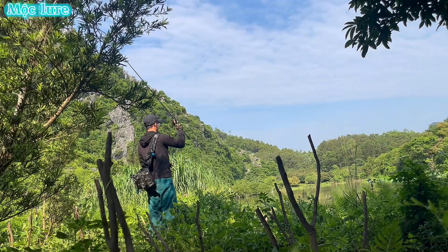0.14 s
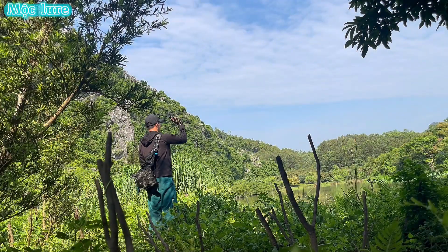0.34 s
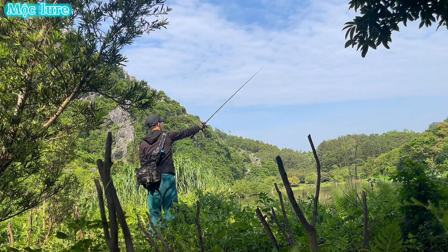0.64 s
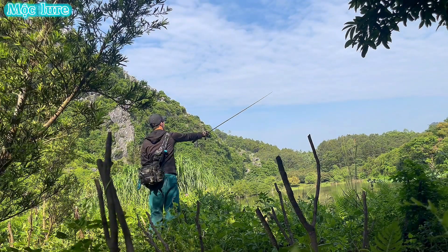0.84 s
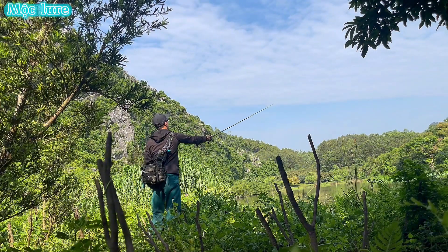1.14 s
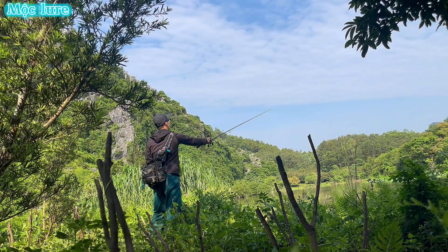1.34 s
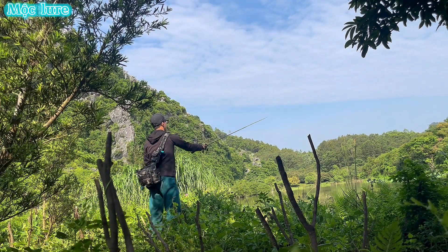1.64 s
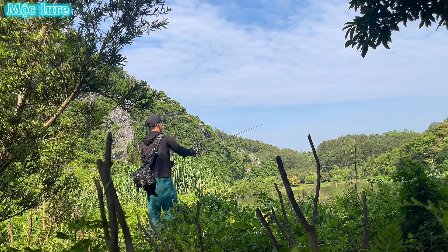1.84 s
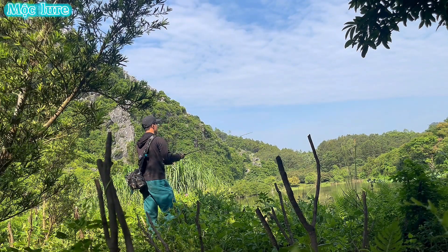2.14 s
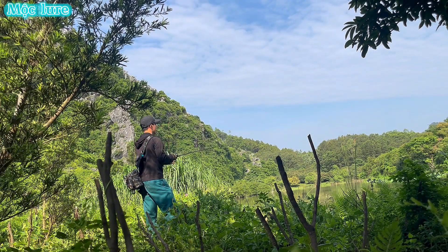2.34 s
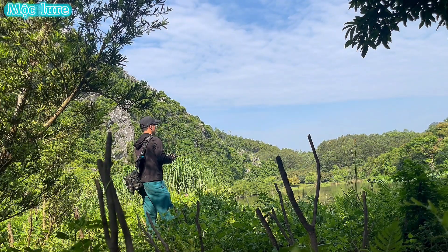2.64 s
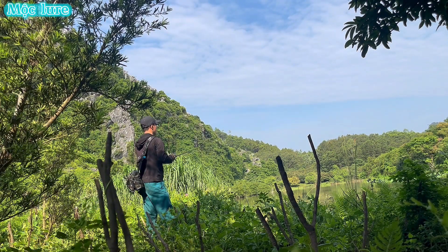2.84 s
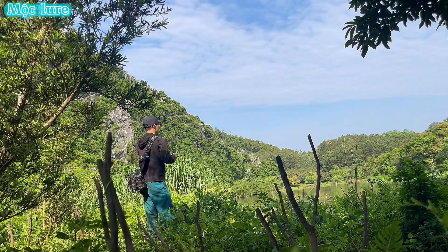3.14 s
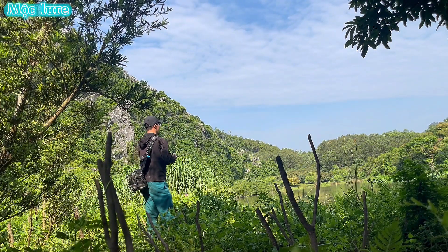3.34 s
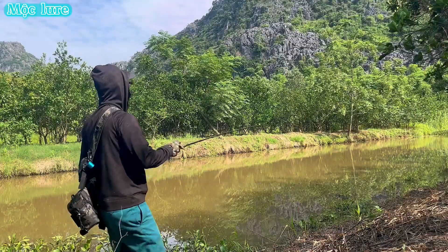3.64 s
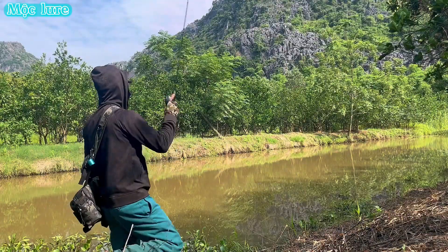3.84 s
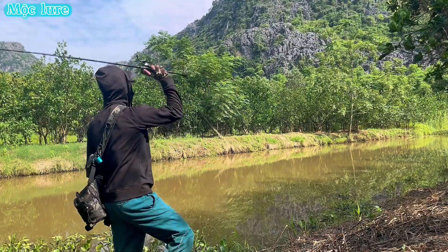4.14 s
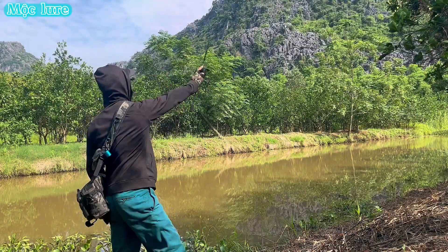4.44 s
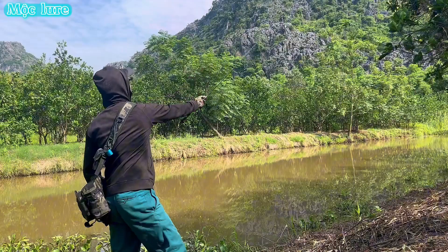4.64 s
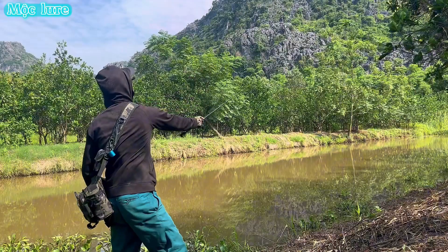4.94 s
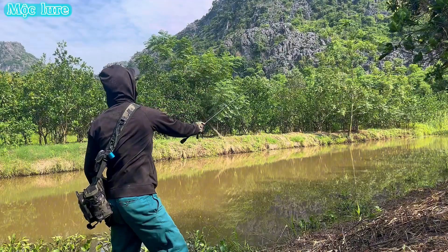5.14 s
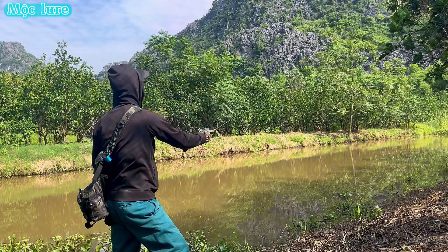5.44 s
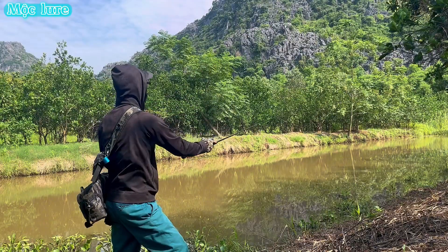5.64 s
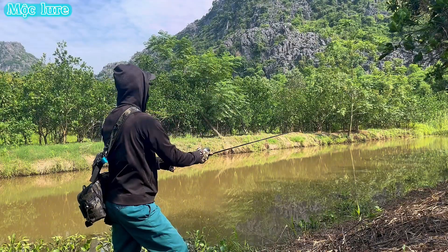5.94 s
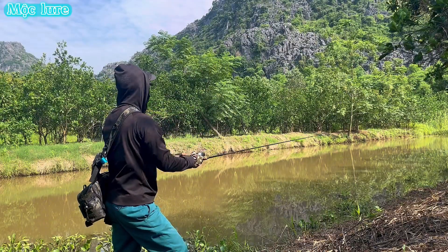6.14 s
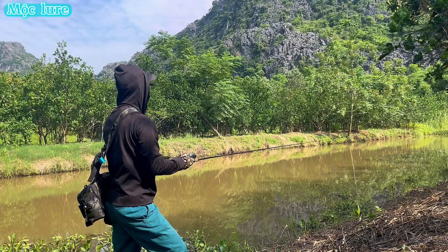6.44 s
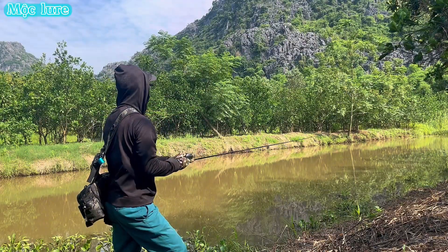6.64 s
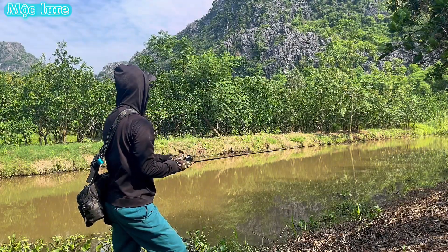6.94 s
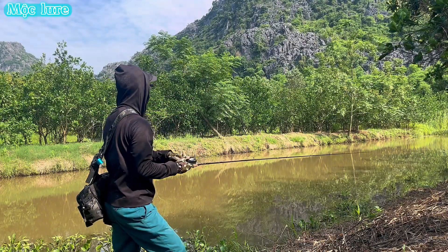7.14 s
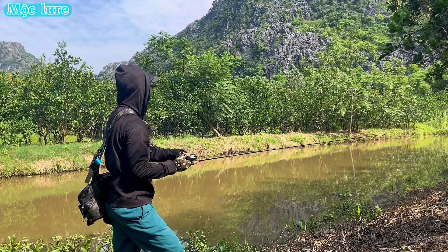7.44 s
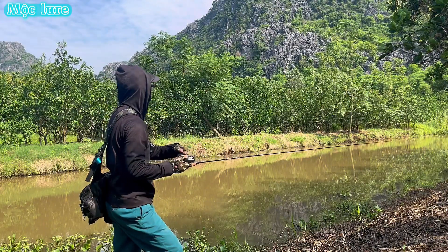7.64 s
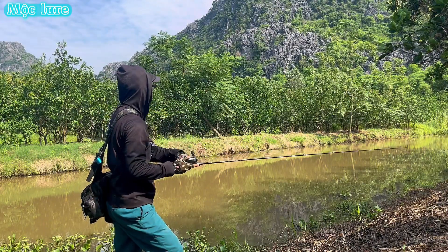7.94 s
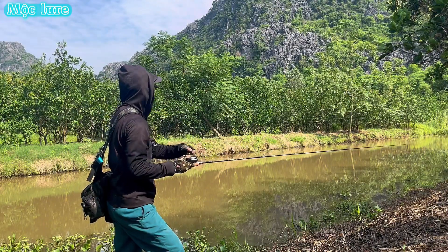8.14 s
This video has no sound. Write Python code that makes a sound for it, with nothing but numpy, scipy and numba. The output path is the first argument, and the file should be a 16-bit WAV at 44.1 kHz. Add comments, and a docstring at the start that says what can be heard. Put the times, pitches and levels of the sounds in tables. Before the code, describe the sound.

From 0 to 3.44 seconds, a wide meadow carries low breeze rumble, rustle and a dense pulsing cricket chorus around five kilohertz, weighted right, plus a nearer high trill with short gaps. Tackle clicks at 0.33 and 0.43; a bright whipping swish with line hiss peaks around 0.55, scattering off foliage. Clicks follow at 0.73, 0.92 and 1.37 over a faint spool whine and line whistle fading by 1.6. Small clicks come at 1.86 and 2.6. Bird whistles swoop down and up from 2.3 to 3.2, with dull rustles. Sharp clicks at 3.18 and 3.48 straddle the abrupt cut. The rumble vanishes, leaving quieter, steady, hissy cicadas. A soft rush precedes a short backswing whoosh and thump at 4.2, then a sharper forward whip and line snap at 4.43-4.48. Small reel clicks sound around 6.9; cicadas continue to the end, about 8.4.

```python
"""Crickets over a low meadow rumble come first: a throbbing chorus, one near trill, then a swooping bird.
An angler casts there: the rod sheds swept vortex tones, the tackle clicks, the spool whines, line whistles.
After a cut with a click, a quieter pond with far cicadas (noise clicks through resonances) has a second cast:
the rod swishes back and forth and the reel clicks shut. Leaves and hillside scatter decaying noise echoes."""
import sys
import numpy as np
from scipy import signal
from scipy.fft import rfft, irfft, next_fast_len
from scipy.io import wavfile
from numba import njit

SR = 44100
rng = np.random.default_rng(int(sys.argv[2]) if len(sys.argv) > 2 else 0)


def transcribe(signal):
    """Save signal, clipped to [-1, 1], as a 16-bit WAV file at the path in sys.argv[1]."""
    frames = np.atleast_2d(signal).T
    limited = np.clip(frames, -1, 1)
    pcm = np.round(limited * 32767).astype(np.int16)
    wavfile.write(sys.argv[1], SR, pcm)


N = 365588
t = np.arange(N) / SR

MEADOW_END_S, POND_START_S = 3.441, 3.463
TOP_HZ = 15800
GUST_S, GUST_WIDTH_S, GUST_DB = 2.32, 0.7, 3.5  # one swell of the breeze
RUMBLE_DB = -43
BUZZ_HZ = 101.5  # stroke rate of the nearest chorus singers
STROKE_PERIOD_S = .0329  # near cricket
BIRD_TOP_HZ, BIRD_FADE_S = 2626, 0.016
THROAT_HZ, THROAT_WIDTH_HZ = 2390, 510
REEL_RING_HZ, REEL_RING_DB = 1965, -50
PAYOUT_START_S, PAYOUT_END_S = 0.49, 1.61
SLOW_TONE_SHARE = 0.54  # share of the top tone left as the rod comes to rest
LOUDNESS_POWER = 1.37  # amplitude follows speed to this power

# Noise colours, relative levels: (frequency [Hz], density [dB per Hz])
# meadow rumble, common to both sides
RUMBLE_COLOUR = [(15, -50), (25, -24), (53, 1), (80, 2.5), (99, -0.5), (225, -17.5), (482, -29.5),
                 (908, -33.5), (1050, -30.5), (1330, -30), (1510, -33.5), (1980, -18.5), (2960, -17),
                 (3660, -29.5), (3900, -25.5), (5070, -25), (8580, -120)]
# meadow rustle, opposite on the two sides
RUSTLE_COLOUR = [(25, -25), (70, -1), (130, -3), (250, -11.5), (500, -13.5), (900, -12.5), (1350, -4),
                 (1700, -9), (2200, -7), (3100, -8), (3700, -32), (6000, -25)]
# small insects' hiss
INSECT_HISS_COLOUR = [(2500, -23), (4000, 2.5), (6500, 4), (8300, 1.5), (10600, 5.5), (11200, -6.5),
                      (12200, -66), (14800, -1.5), (16000, -36)]
# pond background
POND_AIR_COLOUR = [(22, -26), (55, 1.5), (100, 0), (200, -12.5), (400, -20), (800, -28), (1200, -30),
                   (2200, -9.5), (5500, -12), (7200, -18.5), (10000, -17.5), (11500, -28), (12600, -36.5),
                   (15000, -38)]
# line running through the rings
LINE_HISS_COLOUR = [(1500, -6), (3500, 2.5), (4800, 0), (6200, -7.5), (9000, 0), (11000, -4), (12500, -24),
                    (14500, 0), (16000, -17)]
# line slaps and bright click snaps
SNAP_COLOUR = [(3000, -18), (6500, -15), (8600, 1), (11000, 1), (12500, -15), (14500, -3), (16000, -14),
               (18000, -40)]

# Cricket chorus groups: (pitch [Hz], pitch spread [Hz], level [dB], left minus right [dB], chirp rate [1/s],
# first chirp [s], throb depth [0-1], buzz depth [0-1], slow level wander [dB])
CHORUS_GROUPS = [(4732, 185, -41, -8.5, 3.17, 0.046, 0.02, 0, 1.5),
                 (5130, 200, -41, -6.5, 7.665, 0.13, 0.1, 0.24, 1),
                 (5462, 190, -40, -11, 7.665, 0.12, 0.32, 0.17, .5)]
# Near cricket's trills: (first stroke [s], end [s], level [dB])
CRICKET_TRILLS = [(.025, .96, -42), (1.342, 1.62, -46.5), (1.668, 3.43, -43.5)]
# Bird's swoops, level before the throat resonance: (lowest point [s], fall [s], rise [s], lowest pitch [Hz],
# level going down [dB], level going up [dB])
BIRD_SWOOPS = [(2.3, .05, 0.053, 2500, -49, -47.5), (2.545, .049, 0.084, 1830, -60, -37),
               (2.806, .085, .11, 1557, -44.5, -32.5), (3.113, .085, .11, 1637, -39.5, -37.5)]
# Bird's thin upper notes: (start [s], end [s], first pitch [Hz], last pitch [Hz], level [dB])
BIRD_UPPER_NOTES = [(2.22, 2.31, 3270, 3010, -58), (2.56, 2.64, 3080, 3030, -45)]
# Cicada resonances: (centre [Hz], width [Hz], level [dB], throb [dB])
CICADA_RESONANCES = [(1668, 355, -57.5, 1.48), (3248, 750, -51, 0.5), (4700, 170, -56, 1),
                     (4610, 1100, -58.5, 0.3)]
# Thin insect tones at the pond: (pitch [Hz], level [dB])
POND_INSECT_TONES = [(5136, -69), (9943, -76), (10740, -80)]
# Clicks of the tackle, and one at the cut between scenes: (time [s], peak of the ring [dB], main ring [Hz],
# rattle t60 [s], bright snap relative to the click [dB])
CLICK_EVENTS = [(.328, -21.5, 2190, 0.083, -14), (.43, -26.5, 2270, .06, -35),
                (.733, -23.5, 2090, 0.14, -30), (.917, -25.5, 2060, 0.076, -35),
                (1.365, -34.5, 2000, .05, -30), (1.862, -30.5, 2880, .03, -28),
                (2.619, -28.5, 3070, .03, -4), (2.65, -23, 2040, 0.091, -28),
                (3.148, -25.5, 2800, 0.045, -24), (3.1758, -18, 2800, .053, -11.5),
                (3.4817, -26, 2280, 0.034, -25), (3.4825, -20.5, 3430, 0.052, -16),
                (4.4825, -23.5, 1753, .035, -14), (6.8807, -31, 1850, 0.055, -13),
                (6.9403, -27.5, 1820, 0.11, -11), (6.9414, -35, 3200, .04, -26),
                (6.9645, -32.5, 1890, .045, -11)]
# Click resonances: (multiple of the main ring [1], width / centre [1], level [dB])
CLICK_MODES = [(.6, 0.17, -19), (1, 0.23, 5.5), (1.45, 0.24, -3), (2.2, 0.6, -9)]
# Dull knocks, rustles and low puffs of air:
# (time [s], peak [dB], centre [Hz], excitation t60 [s], width / centre [1])
DULL_EVENTS = [(2.437, -40, 696, 0.32, 2.3), (2.55, -45.5, 850, 0.53, 1.6), (2.72, -40.5, 547, 0.04, 0.11),
               (2.934, -39.5, 378, 0.045, 0.46), (3.05, -41.5, 750, 0.12, 2.8),
               (3.178, -31, 1730, 0.054, 0.13), (3.252, -36, 457, 0.25, 2.5), (3.399, -35, 482, 0.18, 2.4),
               (3.482, -33, 1050, 0.025, 1.4), (3.6, -48, 1000, 0.11, 1.4),
               (3.701, -44.5, 1000, 0.027, 1.8), (3.883, -42.5, 650, 0.051, 2.3),
               (4.192, -24.5, 553, .04, 0.89), (4.272, -36, 900, .03, 1.6), (4.314, -37.5, 800, 0.021, 1.8),
               (4.445, -37.5, 70, 0.24, 0.91), (6.3, -41, 45, 0.45, 0.78), (6.942, -46.5, 98, 0.091, 0.43),
               (6.965, -49, 880, 0.063, 0.71)]
# Spool whine during payout: (time [s], whine [Hz], level [dB])
SPOOL_WHINE = [(.7, 1487, -74), (.8, 1610, -67), (.94, 1715, -58.5), (.955, 1850, -50), (1.04, 1768, -52.5),
               (1.2, 1650, -59), (1.33, 1580, -63), (1.4, 1520, -74)]
# Whistles of the running line: (start [s], end [s], first pitch [Hz], last pitch [Hz], level [dB])
RUNNING_LINE_WHISTLES = [(.68, .95, 1300, 1303, -62), (1.32, 1.52, 1397, 1210, -58.5),
                         (1.5, 1.63, 1377, 1340, -61)]
# Line slaps on the rings: (time [s], length [s], level at onset [dB])
LINE_SLAPS = [(0.559, 0.0058, -25.5), (0.572, .009, -24), (0.931, 0.0079, -29), (4.461, .002, -37),
              (4.468, .003, -31), (4.4748, .0035, -29.5), (4.4795, 0.0033, -29.5)]
# Line zips off the finger: (start [s], end [s], first pitch [Hz], last pitch [Hz], level [dB])
FINGER_ZIPS = [(4.4362, 4.4412, 3900, 5200, -29)]
# Vortex shedders, rod butt, middle, tip and rings: (multiple of the tone [1], width / centre [1], level [dB])
ROD_VORTICES = [(.24, 1, -16), (.6, 0.86, -7), (1, 0.77, -1), (1.8, 0.68, -15)]
# Rod strokes: (fastest point [s], speed-up [s], slow-down [s], top vortex tone [Hz], rush [dB],
# clean tone [dB], line hiss [dB], low puff [dB])
ROD_STROKES = [(.521, .008, .012, 1020, -47, -38.5, -37, -59),
               (.537, .006, 0.0082, 1250, -34, -30, -45, -53), (.54, .01, 0.013, 399.3, -56, -39, -70, -57),
               (0.549, .011, .014, 2800, -30, -43, -37, -45),
               (.573, .02, 0.024, 2397, -32.5, -37, -30.5, -45),
               (.604, .007, 0.012, 747, -44, -44, -57, -68), (.64, .0189, .06, 1080, -63, -55, -60, -72),
               (.65, .06, 0.1, 2700, -45, -62, -46.5, -68), (3.7, .3, 0.23, 750, -66, -90, -61, -67.5),
               (4.196, .0053, 0.011, 620, -32.5, -43, -48, -52),
               (4.215, .008, 0.013, 624, -37.5, -41, -54, -50),
               (4.275, .11, .056, 800, -54, -67, -46.5, -65),
               (4.295, .0067, .007, 1200, -44, -50, -59, -60), (4.426, .018, .01, 640, -40, -49, -46, -61),
               (4.443, .004, .004, 560, -37, -38, -50, -49),
               (4.446, .007, .006, 1800, -29.5, -41, -44, -58),
               (4.458, .008, 0.009, 2100, -29, -38, -40, -58),
               (4.474, .005, .005, 2500, -35.5, -52, -42, -56),
               (4.482, .0035, 0.0062, 1500, -31, -38, -37.5, -40.5)]


def undb(db):
    """Decibels to amplitude gain."""
    return 10 ** (np.asarray(db) / 20)


def unit(x):
    """Scale to rms 1."""
    return x / np.sqrt(np.mean(x ** 2) + 1e-20)


def during(start_s, end_s, fade_s=0.00087):
    """Gate with linear ramps."""
    return np.clip((t - start_s) / fade_s, 0, 1) * np.clip((end_s - t) / fade_s, 0, 1)


def pan(db):
    """Left and right gains for a left-minus-right level."""
    return undb(np.array([[db], [-db]]) / 2)


def place(x, pan_db=0, lead_ms=0):
    """An off-centre source: louder on one side, later on the right."""
    delay = int(round(lead_ms * SR / 1000))
    return np.array([x, np.roll(x, delay)]) * pan(pan_db)


def add(out, start_s, x):
    """Mix a short sound in at a time."""
    i = int(max(start_s, 0) * SR)
    out[i:i + len(x)] += x[:max(N - i, 0)]


def walk(knots_per_s, size=N):
    """Interpolated random wander with a spread near 1."""
    knots = rng.standard_normal(2000)
    return 1.243 * np.interp(t[:size] * knots_per_s, np.arange(len(knots)), knots)


def noise(colour):
    """Gaussian noise shaped by a colour table, rms 1."""
    hz, db = np.transpose(colour)
    size = next_fast_len(N)
    f = np.maximum(np.fft.rfftfreq(size, 1 / SR), 1)
    gain = undb(np.interp(np.log(f), np.log(hz), db))
    return unit(irfft(rfft(rng.standard_normal(size)) * gain, size)[:N])


@njit
def svf(x, g, k):
    """State-variable band-pass with a moving centre."""
    y, band, low = np.empty(len(x)), 0., 0.
    for i in range(len(x)):
        v = (band + g[i] * (x[i] - low)) / (1 + g[i] * (g[i] + k))
        band, low, y[i] = 2 * v - band, low + 2 * g[i] * v, k * v
    return y


def resonate(x, hz, share):
    """Two cascaded band-passes, each of width share times centre."""
    g = np.tan(np.pi * np.minimum(hz, TOP_HZ) / SR) * np.ones(len(x))
    once = svf(x + 1e-18, g, float(share))
    return svf(once, g, float(share))


def foliage(x, t60_s):
    """Diffuse scatter from leaves and hillside: decaying noise, independent per side."""
    age = t[:SR // 2]
    tail = rng.standard_normal((2, len(age))) * undb(-60 * age / t60_s)
    return signal.fftconvolve(x[None], unit(tail) / np.sqrt(len(age)), axes=1)[:, :N]


def whistle(hz, db, waver, flicker_db=1.5):
    """Near-pure tone of moving pitch and level."""
    size = len(hz)
    phase = 2 * np.pi * np.cumsum(hz * (1 + waver * walk(200, size))) / SR
    return np.sqrt(2) * undb(db + flicker_db * walk(60.3, size)) * np.sin(phase)


def glides(notes, waver=0.014):
    """Soft-edged whistles sliding between two pitches."""
    out = np.zeros(N)
    for start_s, end_s, first_hz, last_hz, db in notes:
        u = np.linspace(0, 1, max(int((end_s - start_s) * SR), 2))
        tone = whistle(first_hz + (last_hz - first_hz) * u, db, waver)
        add(out, start_s, tone * np.sqrt(np.abs(np.sin(np.pi * u))))
    return out


def meadow_air(wide_db=-52.0, hiss_db=-47, spread_db=-14, wide_gust_db=4):
    """Central rumble and side-opposed rustle swell with the breeze; small insects hiss."""
    flip = np.array([[1], [-1]])
    gust = np.exp(-((t - GUST_S) / GUST_WIDTH_S) ** 2)
    rumble = noise(RUMBLE_COLOUR) * undb(RUMBLE_DB + GUST_DB * gust + 1.5 * walk(9.05))
    rustle = noise(RUSTLE_COLOUR) * flip * undb(wide_db + wide_gust_db * gust + walk(9.54))
    hiss = place(noise(INSECT_HISS_COLOUR), 0, .11)
    hiss = hiss + undb(spread_db) * noise(INSECT_HISS_COLOUR) * flip
    return rumble + rustle + hiss * undb(hiss_db + .5 * walk(19))


def pond_air():
    """Coloured noise with a slight level wander."""
    return noise(POND_AIR_COLOUR) * undb(-54.5 + 0.46 * walk(8.6))


def chorus(count=9, stroke_hz=55, glide=0.033, scatter=1.0, crowd_db=-0.5, wander=.008,
           lead_ms=.41, drift=.009, turns_db=3.0, crowd_width=3.43):
    """Far crickets: each wing stroke is a falling tone; singers drift and swell, groups chirp in step."""
    out, size = 0, int(MEADOW_END_S * SR) + 1
    buzz_phase = 2 * np.pi * np.cumsum(BUZZ_HZ * (1 + 0.039 * walk(13))) / SR
    buzz = np.cos(buzz_phase) + .45 * np.cos(2 * buzz_phase)
    for hz, spread_hz, db, pan_db, rate_hz, first_s, depth, buzz_depth, swell_db in CHORUS_GROUPS:
        group = np.zeros(N)
        for rank, (pace, start, tune) in zip(np.linspace(-1, 1, count), rng.random((count, 3))):
            unrest = walk(35, size)
            singer_stroke_hz = stroke_hz * (.6 + pace) * (1 + 0.0987 * unrest)
            stroke = (np.cumsum(singer_stroke_hz) / SR + start) % 1
            pitch_hz = hz + spread_hz * (rank + .2 * (tune - .5))
            pitch_hz = pitch_hz * (1 + glide * (.5 - stroke) + wander * unrest + drift * walk(7, size))
            effort = undb(turns_db * walk(11, size))
            tone = np.sin(2 * np.pi * np.cumsum(pitch_hz) / SR)
            add(group, 0, effort * np.sin(np.pi * stroke) ** 4 * tone)
        group /= group[:size].std()
        # farthest singers merge into a band from all around
        share = crowd_width * spread_hz / hz
        crowd = np.array([unit(resonate(rng.standard_normal(N), hz, share)) for side in range(2)])
        both = place(group, 0, lead_ms) + scatter * foliage(group, 0.13) + undb(crowd_db) * crowd
        both *= 1 + depth * np.cos(2 * np.pi * rate_hz * (t - first_s))
        both *= (1 + buzz_depth * buzz) * undb(swell_db * walk(5.98))
        out = out + both / both[:, :size].std() * undb(db) * pan(pan_db)
    return out


def near_cricket(length_s=0.02, top_hz=7340, fall_hz=340, crest=0.36, rasp=0.31, lead_ms=.11, effort_db=-0.2):
    """Thirty wing strokes a second; pitch arches as each stroke speeds up and slows down."""
    out, u = np.zeros(N), np.linspace(0, 1, int(length_s * SR))
    envelope = np.minimum(1, np.minimum(u / .25, (1 - u) / .25))
    for first_s, end_s, db in CRICKET_TRILLS:
        for s in np.arange(first_s, end_s, STROKE_PERIOD_S):
            size, tune, phase = rng.standard_normal(3)
            pitch_hz = top_hz + 15 * tune - fall_hz * ((u - crest) / (1 - crest)) ** 2
            tone = np.sin(2 * np.pi * (np.cumsum(pitch_hz) / SR + phase))
            add(out, s - .45 * length_s, undb(db + .5 * size) * envelope * tone)
    out *= np.sqrt(2) * undb(effort_db * walk(5.1)) * (1 + rasp * walk(230))
    return place(out, 2.5, lead_ms) + undb(-20) * foliage(out, .12)


def bird(lead_ms=0.37, echo_db=-9):
    """Swoops fall, rise more slowly and flare through the throat resonance; trees echo."""
    song = glides(BIRD_UPPER_NOTES)
    for s, fall_s, rise_s, low_hz, down_db, up_db in BIRD_SWOOPS:
        age_s = np.arange(-fall_s, rise_s, 1 / SR)
        u = age_s / np.where(age_s < 0, fall_s, rise_s) / 2
        hz = BIRD_TOP_HZ - (BIRD_TOP_HZ - low_hz) * np.cos(np.pi * u) ** 2
        db = down_db + (up_db - down_db) * (1 + np.sin(np.pi * u)) / 2
        throat = 1 / (1 + (2 * (hz - THROAT_HZ) / THROAT_WIDTH_HZ) ** 2)
        fade = np.clip(np.minimum(age_s + fall_s, rise_s - age_s) / BIRD_FADE_S, 0, 1)
        add(song, s - fall_s, whistle(hz, db, waver=0.006) * throat * fade)
    return place(song, 0.9, lead_ms) + undb(echo_db) * foliage(song, 0.08)


def cicadas(grain_db=3, pulse_hz=5.9, pulse_s=4.684, pulse_db=-55, chirr_hz=37, chirr=0.078):
    """Dense tymbal clicks in quick bursts ring resonances; one insect pulses above for three seconds."""
    out = 0
    for hz, width_hz, db, throb_db in CICADA_RESONANCES:
        bursts = 1 + chirr * np.cos(2 * np.pi * np.cumsum(chirr_hz * (1 + 0.118 * walk(15))) / SR)
        clicks = rng.standard_normal(N) * undb(grain_db * rng.standard_normal(N)) * bursts
        level = undb(db + .5 * walk(1.56) + throb_db * walk(14))
        out = out + unit(resonate(clicks, hz, width_hz / hz)) * level
    beat = (.5 + .5 * np.cos(2 * np.pi * pulse_hz * (t - pulse_s))) * during(3.78, 6.8, 0.059)
    out += unit(resonate(rng.standard_normal(N), 5016, 0.088)) * beat * undb(pulse_db)
    for hz, db in POND_INSECT_TONES:
        phase = 2 * np.pi * np.cumsum(hz * (1 + 0.00089 * walk(40))) / SR
        out += np.sqrt(2) * undb(db + 2 * walk(13)) * np.sin(phase)
    return out


def clicks_and_knocks(contact_s=0.0012, tail_db=-14, body_low_hz=1550, body_high_hz=4700,
                      snap_s=.0015, soft_hz=10500):
    """Clicks ring small-body resonances and rattle out; band-passed noise gives knocks, rustles and puffs."""
    out, age_s = np.zeros(N), t[:SR // 3]
    # plastic parts and gloved hands give little top treble
    soften = signal.butter(5, min(soft_hz, TOP_HZ), fs=SR, output="sos")
    bright = signal.sosfilt(soften, noise(SNAP_COLOUR))
    body = signal.butter(3, [body_low_hz, min(body_high_hz, TOP_HZ)], "bandpass", fs=SR, output="sos")
    for s, db, hz, t60_s, snap_db in CLICK_EVENTS:
        push = np.exp(-age_s / contact_s) + undb(tail_db - 60 * age_s / t60_s)
        push = rng.standard_normal(len(age_s)) * push
        push[0] += 6  # first hard contact
        modes = sum(undb(mode_db) * resonate(push, hz * k, share) for k, share, mode_db in CLICK_MODES)
        ring = signal.sosfilt(body, modes)
        snap = bright[int(s * SR):][:len(age_s)] * np.exp(-age_s / snap_s)
        add(out, s, undb(db) * (ring / np.abs(ring).max() + undb(snap_db) * snap))
    for s, db, hz, t60_s, share in DULL_EVENTS:
        dull = resonate(rng.standard_normal(len(age_s)) * undb(-60 * age_s / t60_s), hz, share)
        add(out, s, undb(db) * dull / np.abs(dull).max())
    return out


def spool(ring_share=0.026, ring_fade_s=0.52):
    """Whine pitch follows spool speed; the running line whistles and keeps the reel ringing."""
    s, hz, db = np.transpose(SPOOL_WHINE)
    whine = whistle(np.interp(t, s, hz), np.interp(t, s, db), waver=.008, flicker_db=2.0)
    whine = whine * during(s[0], s[-1], .03)
    ring = unit(resonate(rng.standard_normal(N), REEL_RING_HZ, ring_share)) * undb(2.9 * walk(20))
    ring = ring * np.clip((PAYOUT_END_S - t) / ring_fade_s, 0, 1) * during(PAYOUT_START_S, PAYOUT_END_S, .03)
    return whine + glides(RUNNING_LINE_WHISTLES) + undb(REEL_RING_DB) * ring


def slaps(fall_share=0.85):
    """The freed line whips the rings in short bright bursts and zips once over the finger."""
    envelope = np.zeros(N)
    for s, length_s, db in LINE_SLAPS:
        u = np.linspace(0, 1, max(int(length_s * SR), 2))
        add(envelope, s, undb(db) * (1 - fall_share * u))
    return envelope * noise(SNAP_COLOUR) + glides(FINGER_ZIPS, waver=.02)


def cast(flutter_db=2.0, puff_hz=150):
    """Vortex tones sweep with rod speed, higher from thinner parts; line hisses through the rings."""
    out, hiss = np.zeros(N), noise(LINE_HISS_COLOUR)
    puff = unit(resonate(rng.standard_normal(N), puff_hz, 1.15))  # air pushed along by the arm
    for s, rise_s, fall_s, top_hz, rush_db, tone_db, line_db, puff_db in ROD_STROKES:
        near = (t > s - 8 * rise_s) & (t < s + 8 * fall_s)
        age_s = t[near] - s
        speed = 1 / (1 + (age_s / np.where(age_s < 0, rise_s, fall_s)) ** 2)
        hz = top_hz * (SLOW_TONE_SHARE + (1 - SLOW_TONE_SHARE) * speed)
        eddies = rng.standard_normal(N)[near]
        rush = 0
        for k, share, db in ROD_VORTICES:
            band_rms = np.sqrt(np.pi / 2 * hz * k * share / SR)  # evens out the bandwidth
            rush = rush + undb(db) * resonate(eddies, hz * k, share) / band_rms
        air = undb(rush_db) * rush + whistle(hz, tone_db, waver=0.0398)
        air = air + undb(line_db) * hiss[near] + undb(puff_db) * puff[near]
        out[near] += air * speed ** LOUDNESS_POWER
    return out * undb(flutter_db * walk(150))


def scene():
    """Wide meadow, then the pond with its direct sound centred; clicks and knocks run through both."""
    swish, whine = cast() + slaps(), spool()
    meadow = meadow_air() + chorus() + near_cricket() + bird()
    meadow += place(swish + whine, .3, .11) + undb(-6.0) * foliage(swish, 0.25)
    meadow += undb(-9) * foliage(whine, 0.51)  # the line's whine lingers on the hillside
    pond = pond_air() + cicadas() + swish + undb(-13.5) * foliage(swish, 0.58)[0]
    return meadow * during(0, MEADOW_END_S) + pond * during(POND_START_S, N / SR) + clicks_and_knocks()


def record(dry):
    """Steep elliptic low-pass at TOP_HZ."""
    return signal.sosfilt(signal.ellip(8, .2, 70, TOP_HZ, fs=SR, output="sos"), dry)


dry = scene()
out = record(dry)
transcribe(out)
```